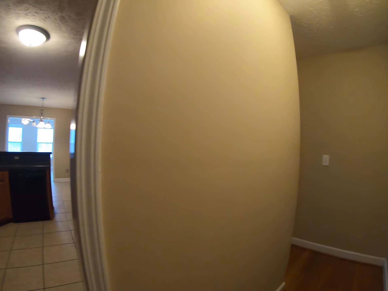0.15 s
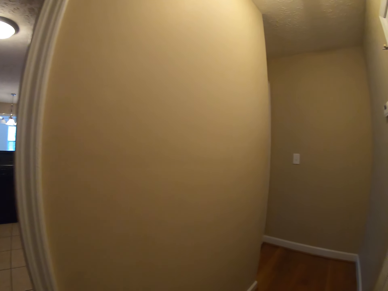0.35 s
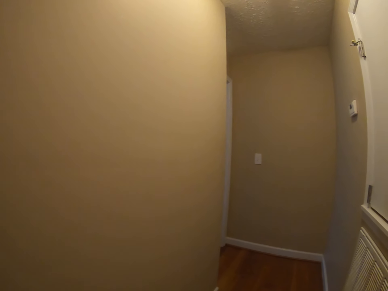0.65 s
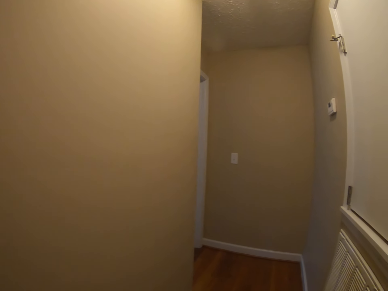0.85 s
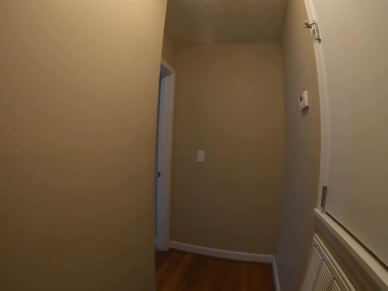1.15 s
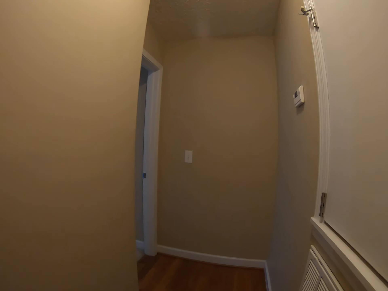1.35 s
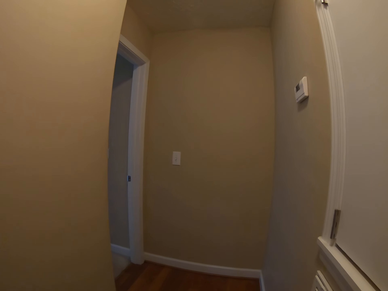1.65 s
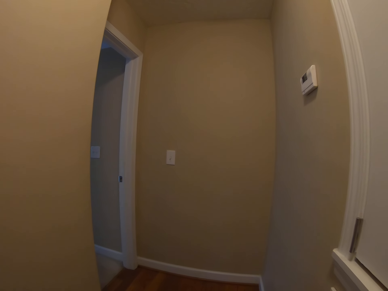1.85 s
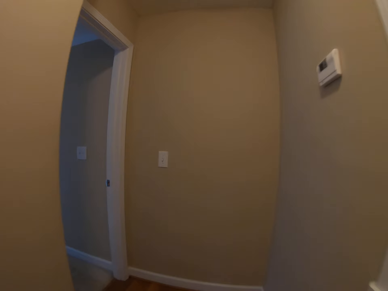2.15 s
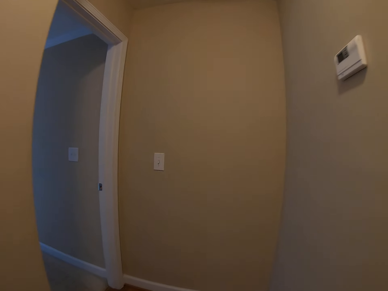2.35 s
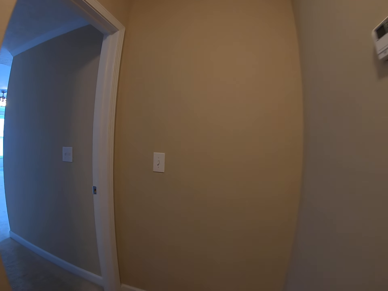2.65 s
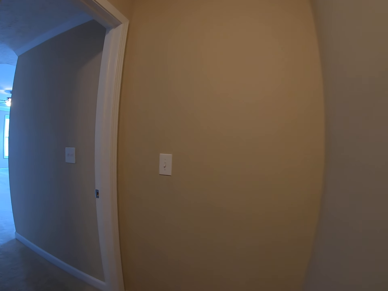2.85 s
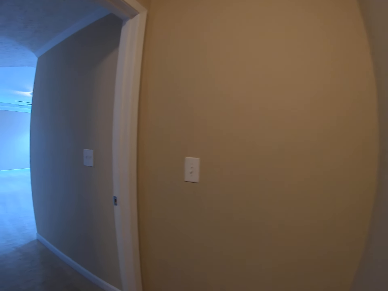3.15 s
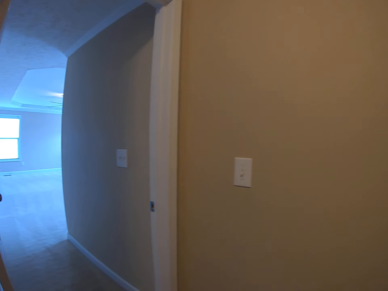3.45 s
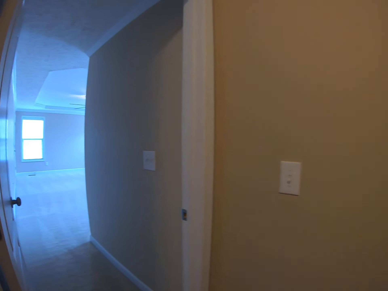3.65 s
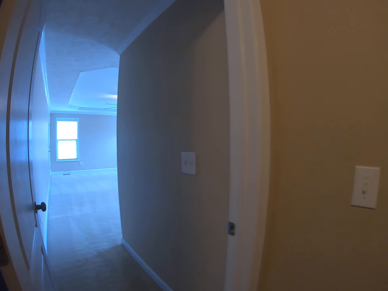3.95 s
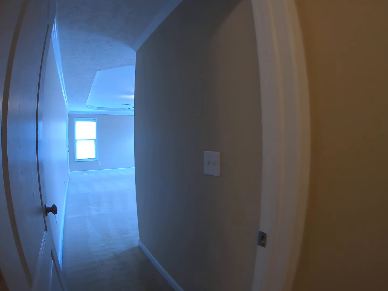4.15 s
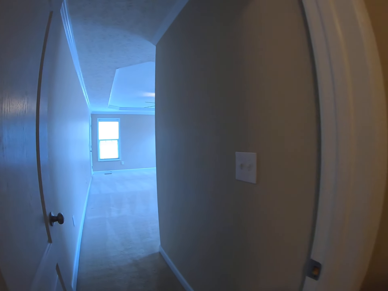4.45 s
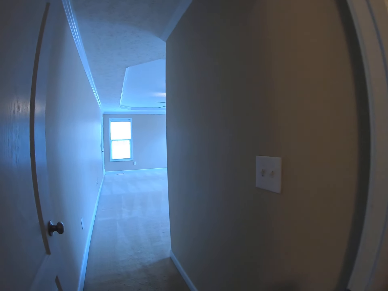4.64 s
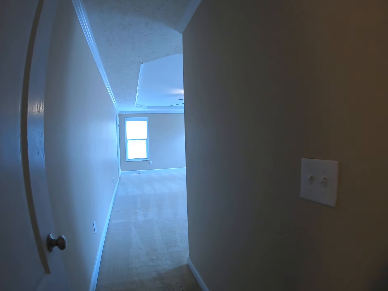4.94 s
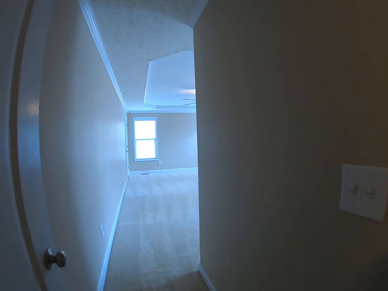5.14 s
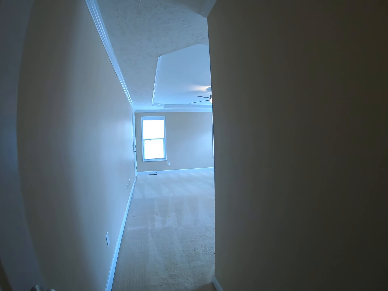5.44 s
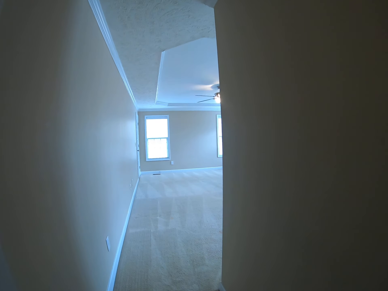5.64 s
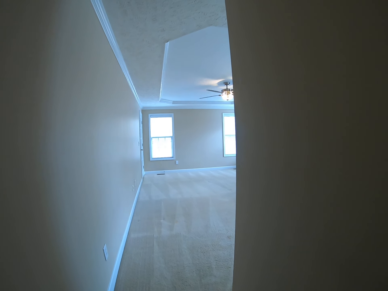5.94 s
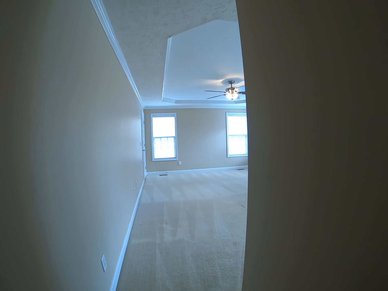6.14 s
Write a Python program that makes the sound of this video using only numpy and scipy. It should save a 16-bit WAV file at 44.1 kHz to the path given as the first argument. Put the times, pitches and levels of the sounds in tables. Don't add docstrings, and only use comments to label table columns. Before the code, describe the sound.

A small handheld camera is carried down a bare hallway in an empty house. A low hum and faint hiss open the scene, with a thin wavering motor whine near 1 kHz that swells around 1 second, dips near 2, and is clearer again from 3 to 5. Soft footsteps land at about 0.4, 1.2, 2.0, 2.7, 3.5, 4.3, 5.1 and 6.0 seconds. Each has a dull low heel thud, a toe thud shortly after, then a dry sole scuff about a quarter second after the heel, with gritty snaps, little knocks and brief squeaks. Heels are firmest at 1.2 and 2.0; scuffs are crisp near 1.5, 3.75 and 4.6. Boards ring briefly and bare walls give a short echo. The hum thins near 4.4, then returns. The final step is very soft, followed by a tiny plastic click at 6.1.

```python
import sys
import numpy as np
from scipy import signal
from scipy.fft import rfft, irfft, next_fast_len
from scipy.io import wavfile
from scipy.ndimage import uniform_filter1d

SR = 44100
rng = np.random.default_rng(int(sys.argv[2]) if len(sys.argv) > 2 else 0)


def nominal_scale(level):
    x = np.asarray(level, float) / 20
    return 10 ** x


def wrap_up_sound(samples):
    columns = np.atleast_2d(samples).T
    tamed = np.clip(columns, -1, 1)
    steps = np.round(tamed * 32767).astype(np.int16)
    wavfile.write(sys.argv[1], SR, steps)


N = 277429
MIC_KNEE_HZ = 8700


def evened(x):
    return x / np.sqrt(np.mean(x ** 2) + 1e-20)


def read(points, hz):
    f, value = np.transpose(points)
    return np.interp(np.log(hz + 1), np.log(f + 1), value)


def add(mix, s, sound):
    part = mix[round(s * SR):][:len(sound)]
    part += sound[:len(part)]


def resonate(x, hz, width):
    turn = np.exp(2j * np.pi * np.cumsum(hz * np.ones(len(x))) / SR)
    r = np.exp(-np.pi * width / SR)
    return 2 * (turn * signal.lfilter([1 - r], [1, -r], x / turn + 1e-18)).real


def resonate_twice(x, hz, width):
    return resonate(resonate(x, hz, width), hz, width)


def colour(x, gain_db):
    size = next_fast_len(x.shape[-1])
    gain = nominal_scale(gain_db(np.fft.rfftfreq(size, 1 / SR)))
    return irfft(rfft(x, size) * gain, size)[..., :x.shape[-1]]


def hump(hz, centre_hz, octaves):
    return np.exp(-.5 * (np.log2((hz + 1) / centre_hz) / octaves) ** 2)


def swell(t, rise):
    return (t / (2 * rise) * np.exp(1 - t / (2 * rise))) ** 2


def turned(x):
    return signal.hilbert(x, next_fast_len(len(x))).imag[:len(x)]


def bursts(rows, octaves, rise):
    t, out = np.arange(16384) / SR, np.zeros(N)
    noises = rng.standard_normal((len(rows), len(t)))
    for (s, db, centre_hz, contact), noise in zip(rows, noises):
        rough = colour(noise, lambda hz: -40 + 40 * hump(hz, centre_hz, octaves))
        stroke = (1 - np.exp(-t / rise)) ** 2 * np.exp(-t / (5.0 * max(contact, .001)))
        burst = stroke * rough
        add(out, s, nominal_scale(db + 0.5) * burst / abs(burst).max())
    return out


def snaps(rows, trim_db):
    t, out = np.arange(1024) / SR, np.zeros(N)
    for s, db, hz, ring in rows:
        snap = np.exp(-t / ring) * np.sin(2 * np.pi * hz * t)
        add(out, s, nominal_scale(db + trim_db) * snap / abs(snap).max())
    return out


# start in seconds, peak in dB, board pitch in Hz, joist thump in dB against the peak.
HEELS = [(0.41, -36, 180, -1), (0.44, -35.5, 162, -21), (0.479, -50.5, 151, 3), (1.237, -24.5, 149.3, -23),
         (1.254, -24, 150.5, -10.5), (1.28, -34, 100, -6), (2.01, -20, 117, -26), (2.03, -27, 157, -9.5),
         (2.081, -44, 151, 2.5), (2.724, -31.5, 161.5, -5), (3.493, -44, 148, -0.5),
         (3.518, -45.5, 151, -9), (4.315, -26, 139.6, -8.5), (4.347, -38, 133, -3), (5.111, -23, 196, -16),
         (5.134, -32.5, 153, -32), (5.162, -36, 162, -7), (5.957, -49.5, 151, -8), (5.993, -46.5, 154, -18),
         (6.04, -51.5, 160, -12)]
# the same four columns, in s, dB, Hz and dB.
TOES = [(0.569, -38, 176, -8), (1.306, -40, 200, -11), (1.327, -34, 166, -9), (1.348, -29.5, 154, -11.5),
        (1.408, -56, 152, 8), (1.437, -44, 172, -19.5), (2.115, -35, 130, -29), (2.139, -37.5, 151.6, -14),
        (2.798, -37.5, 111, -1.5), (2.829, -40.5, 151, -7), (2.865, -37.5, 161, -8),
        (2.898, -39, 188.6, -17), (3.593, -31, 151, -12), (3.637, -40, 162.4, -11), (4.39, -40, 151, -19),
        (4.462, -34, 152, -4.5), (4.53, -46.5, 157, -25), (5.198, -35.5, 169, -25), (5.22, -33, 184, -15),
        (5.28, -39.5, 160, -27)]
# the same four columns, in s, dB, Hz and dB.
LIFTS = [(0.668, -56, 159, 6.5), (0.796, -43.5, 178, -6.5), (1.497, -44, 189, -20),
         (1.565, -44.5, 177.4, -12), (1.815, -48.5, 185, -6), (2.209, -44, 200, -6),
         (2.987, -41.5, 143, -23), (3.081, -53.5, 232, -7), (3.75, -49, 230, -23), (3.8, -61, 181, 9),
         (3.836, -46, 102, -3.5), (4.578, -56, 219, -28), (4.713, -46, 150, -29), (5.321, -47, 212, -18),
         (5.35, -39.5, 173, -8.5), (5.433, -43, 196, -14), (5.96, -44, 48, -18), (6.035, -44, 45, -20)]
# pitch in Hz, width in Hz, level in dB.
FLOOR_MODES = [(63, 15, 4), (151, 12.2, 2), (229.2, 13.7, 6), (280, 9.1, 3.5), (366, 4.3, -6),
               (436, 14, 20), (634, 20, -2)]
# sole slap in dB against the peak, contact time in seconds.
HEEL, TOE, LIFT = (-17, 0.005), (-8.5, 0.0051), (-15, 0.0054)
JOIST_HZ, SLAP_HZ = 77.8, 257


def thuds():
    t, out = np.arange(5000) / SR, np.zeros(N)
    for rows, (slap_db, contact) in ((HEELS, HEEL), (TOES, TOE), (LIFTS, LIFT)):
        for s, db, hz, thump_db in rows:
            board = swell(t, contact) * np.sin(2 * np.pi * hz * t)
            joist = swell(t, 1.42 * contact) * np.sin(2 * np.pi * JOIST_HZ * t)
            slap = swell(t, 0.61 * contact) * np.sin(2 * np.pi * SLAP_HZ * t)
            add(out, s, nominal_scale(db) * (board + nominal_scale(thump_db) * joist + nominal_scale(slap_db) * slap))
    ringing = sum(nominal_scale(db) * resonate(out, hz, width) for hz, width, db in FLOOR_MODES)
    return out + ringing


# start in seconds, peak in dB, fade in seconds, fizz in dB against the peak.
TREADS = [(0.5493, -42.5, 0.032, -17.5), (1.2444, -50.5, 0.024, -2), (1.3063, -37.5, 0.029, -1.5),
          (1.3505, -53, 0.011, -6), (1.7514, -48.5, 0.019, -16), (2.02, -38.5, 0.016, 7),
          (2.1, -51, 0.033, 2), (2.1173, -49, 0.031, -18), (2.7307, -57, 0.013, -10),
          (2.8025, -42.5, 0.021, -6), (2.862, -50, 0.0096, -21), (3.5589, -47.5, 0.014, 17),
          (3.597, -39, 0.019, -12), (3.66, -49, 0.034, -1), (4.278, -54, 0.074, -13),
          (4.3892, -43, 0.017, -7), (4.3994, -43, 0.013, -13), (4.4653, -61, 0.02, -4),
          (4.9198, -54, 0.025, -25), (5.1184, -44.5, 0.019, -3), (5.1237, -38, 0.0046, -32),
          (5.178, -49.5, 0.012, 26), (5.2185, -45.5, 0.028, -4), (5.9408, -58, 0.036, -5),
          (5.9997, -59, 0.051, -18)]
# the same four columns, in s, dB, s and dB.
DRAGS = [(0.662, -42.5, 0.063, -7.5), (0.722, -50.5, 0.037, -18), (1.4631, -39, 0.0085, -12),
         (1.4774, -34, 0.029, -7), (2.195, -43, 0.046, -11), (2.214, -38.5, 0.032, -1),
         (2.2341, -38.5, 0.012, -29), (2.247, -46, 0.015, -13), (2.9548, -45.5, 0.057, -7),
         (2.978, -38.5, 0.043, -7.5), (3.0093, -39.5, 0.018, 1), (3.7238, -42, 0.024, -8),
         (3.7358, -36.5, 0.016, -8), (3.7461, -32, 0.015, -8), (3.757, -34.5, 0.023, -6.5),
         (4.5671, -38, 0.012, 0), (4.5732, -35.5, 0.0097, 1), (4.5954, -36.5, 0.016, -3.5),
         (5.2728, -45, 0.013, -5), (5.293, -42.5, 0.015, -1), (5.319, -42.5, 0.03, -15),
         (5.3429, -40.5, 0.024, -3), (5.364, -38, 0.008, 2), (5.3711, -39, 0.0062, -5),
         (5.385, -46.5, 0.02, -10)]
# pitch in Hz, level in dB per Hz.
SOLE = [(290, -11), (500, -7), (614, -14), (893, -1.5), (1270, 0.5), (2010, -2), (3910, -10), (4740, -11),
        (9000, -14.5), (11700, -42), (19800, -120)]
# squeak in dB against the peak when fizz is 0 dB, shortest rise in seconds.
TREAD, DRAG = (-4.5, .003), (-10.5, .005)
SQUEAK_PER_FIZZ, RISE_PER_FADE = 0.47, .22


def scuffs():
    t, out = np.arange(8192) / SR, np.zeros(N)
    rubs = [(*row, *TREAD) for row in TREADS] + [(*row, *DRAG) for row in DRAGS]
    for s, db, fade, fizz_db, squeak_db, rise in sorted(rubs):
        size = rng.exponential(1, len(t) // 64)
        slips = rng.standard_normal(len(t)) * np.repeat(nominal_scale(2.3 * np.minimum(size, 3.5)), 64)
        squeak_db = squeak_db + SQUEAK_PER_FIZZ * fizz_db
        rise = rise + RISE_PER_FADE * fade

        def sole_db(hz):
            squeak = (squeak_db + 7.0) * hump(hz, 1500, 0.49)
            fizz = (fizz_db + 12.0) * hump(hz, 9730, 0.69)
            return read(SOLE, np.minimum(hz, MIC_KNEE_HZ)) + squeak + fizz

        stroke = np.minimum(t / rise, 1) ** 2 * np.exp(-np.maximum(t - rise, 0) / fade)
        add(out, s - .5 * rise, nominal_scale(db - 6) * evened(colour(slips, sole_db)) * stroke)
    return out


# start in seconds, peak in dB, pitch in Hz, contact in seconds.
KNOCKS = [(0.553, -44.5, 611, 0.0055), (0.574, -46, 681, 0.0067), (0.805, -50.5, 970, 0.0021),
          (1.241, -44.5, 890, 0.0057), (1.307, -40.5, 468, 0.0015), (1.346, -36.5, 740, 0.0016),
          (1.368, -44, 557, 0.0019), (2.006, -39.5, 423, 0.0017), (2.025, -40, 734, 0.0059),
          (2.116, -37, 670, 0.006), (2.236, -44, 660, 0.0035), (2.728, -44, 460, 0.0056),
          (2.806, -41.5, 610, 0.0047), (2.86, -38.5, 730, 0.0025), (2.996, -44, 644, 0.0039),
          (3.401, -56, 980, 0.0017), (3.596, -41, 915, 0.0022), (3.612, -39, 444, 0.0017),
          (3.649, -50, 447, 0.0019), (3.749, -56, 860, 0.0017), (4.313, -42, 417, 0.0044),
          (4.382, -48, 980, 0.0068), (4.463, -44.5, 436, 0.003), (5.111, -47, 945, 0.0051),
          (5.224, -37, 670, 0.00081), (5.29, -44.5, 433, 0.0032), (5.317, -42, 940, 0.0033),
          (5.598, -68, 980, 0.0027), (5.989, -50.5, 1090, 0.003)]
# start in seconds, peak in dB, pitch in Hz, ring in seconds.
RAPS = [(0.569, -40, 528, 0.0015), (0.588, -39, 560, 0.0015), (0.803, -50, 993, 0.0015),
        (1.241, -37, 900, 0.0015), (1.306, -40, 468, 0.0015), (1.347, -38, 452, 0.0015),
        (1.356, -41, 778, 0.0015), (2.014, -37, 536, 0.0015), (2.025, -40, 756, 0.0015),
        (2.116, -39, 738, 0.0015), (2.73, -44, 476, 0.0015), (2.806, -39.5, 627, 0.0015),
        (2.866, -39, 735, 0.0015), (3.401, -51, 999, 0.0015), (3.592, -37, 996, 0.0015),
        (3.614, -40, 460, 0.0015), (4.398, -40, 993, 0.0015), (4.463, -40, 452, 0.0016),
        (5.111, -40, 996, 0.0015), (5.224, -40, 452, 0.0013), (5.224, -35, 670, 0.0015),
        (5.317, -38, 939, 0.0017)]


def knocking():
    return bursts(KNOCKS, octaves=1.09, rise=0.00082) + snaps(RAPS, trim_db=-2.5)


# start in seconds, peak in dB, pitch in Hz, contact in seconds.
SQUEAKS = [(1.35, -45, 1400, 0.0023), (1.478, -40.5, 1540, 0.0032), (2.225, -47.5, 2000, 0.0046),
           (2.24, -59, 2980, 0.005), (2.98, -46, 2150, 0.0032), (3.745, -41, 5000, 0.0046),
           (3.79, -58, 4700, 0.043), (.672, -47.5, 5300, 0.0046), (4.392, -42, 1460, 0.0015),
           (4.392, -46.5, 4730, 0.0024), (4.6, -50, 1820, 0.0038), (5.224, -46, 1350, 0.0016),
           (2.865, -56, 2400, 0.0026), (2.03, -51, 2000, 0.0035), (5.18, -59, 1900, 0.0029),
           (5.275, -62, 3900, 0.003), (5.35, -48, 2170, 0.002), (5.33, -49.5, 2880, 0.0065),
           (2.25, -47, 3600, .003), (5.13, -50.5, 2850, 0.0036)]
# start in seconds, peak in dB, pitch in Hz, contact in seconds.
PIPS = [
    (1.258, -58, 10300, .006),
    (1.258, -52, 14000, .005),
    (3.559, -57, 8800, 0.0035),
    (5.18, -60, 8530, .003),
]


def squeaking():
    return bursts(SQUEAKS, octaves=0.24, rise=0.002) + bursts(PIPS, octaves=.04, rise=.002)


# start in seconds, peak in dB, pitch in Hz, ring in seconds.
GRIT = [(0.548, -40, 2090, 0.0006), (0.5581, -45, 2090, 0.0006), (0.5714, -40, 2290, 0.0006),
        (0.5884, -43, 1560, 0.0006), (0.6624, -41, 2900, 0.0006), (0.6724, -41, 5280, 0.0006),
        (1.2414, -53, 1400, 0.0006), (1.2461, -48, 1770, 0.0006), (1.3067, -38, 1550, 0.0006),
        (1.3144, -43, 1410, 0.0006), (1.4633, -40, 1690, 0.0006), (1.477, -33, 1600, 0.00066),
        (1.4854, -33, 1560, 0.0006), (2.0213, -44, 1470, 0.0006), (2.0274, -36, 1900, 0.0006),
        (2.2096, -39, 1470, 0.0006), (2.225, -35, 2480, 0.0006), (2.2394, -37, 2030, 0.0006),
        (2.2524, -41, 3880, 0.0006), (2.7312, -50, 1690, 0.0006), (2.8035, -45, 1400, 0.0006),
        (2.8074, -45, 1500, 0.0006), (2.8599, -47, 1760, 0.0006), (2.867, -43, 1750, 0.0006),
        (2.9595, -44, 1670, 0.0006), (2.9786, -40, 2120, 0.0006), (2.9824, -36, 2240, 0.0006),
        (2.9994, -34, 2200, 0.0006), (3.016, -39, 2280, 0.0006), (3.5593, -48, 1600, 0.0006),
        (3.592, -45, 1500, 0.0006), (3.6022, -34, 1510, 0.00066), (3.7284, -42, 2010, 0.0006),
        (3.7469, -33, 4100, 0.0006), (3.7556, -31, 4640, 0.0006), (4.3949, -39, 1400, 0.0006),
        (4.395, -36, 1500, 0.0006), (4.5677, -43, 9200, 0.0006), (4.5745, -30.5, 5170, 0.00081),
        (4.5994, -34, 1950, 0.0006), (5.1198, -48, 1720, 0.0006), (5.1243, -41, 3460, 0.0006),
        (5.2254, -41, 1460, 0.0006), (5.2734, -46, 4020, 0.0006), (5.293, -38, 2220, 0.0006),
        (5.317, -39, 2220, 0.0006), (5.3354, -40, 2990, 0.0006), (5.3494, -37, 2100, 0.0006),
        (5.3654, -37, 2160, 0.0006), (5.3727, -35, 2100, 0.00051)]


def gritting():
    return snaps(GRIT, trim_db=-4)


# start in seconds, peak in dB, pitch in Hz, contact in seconds.
RINGS = [(.58, -49.5, 285, .03), (.95, -52, 286, 0.038), (1.26, -43, 282, .012), (2.6, -54, 292, 0.028),
         (2.85, -49, 284, .03), (4.47, -47, 230, 0.0056), (4.56, -47.5, 290, 0.022),
         (2.04, -45, 368, 0.012), (3.72, -46.5, 307, 0.017), (1.35, -39.5, 350, 0.0039),
         (3.608, -40, 171, 0.0034)]


def loose_boards():
    return bursts(RINGS, octaves=0.13, rise=0.0056)


# start in seconds, peak in dB.
TICKS = [
    (6.123, -46),
    (3.3, -60),
    (1.2455, -48),
    (5.785, -55),
]


def ticks():
    t, out = np.arange(300) / SR, np.zeros(N)
    for s, db in TICKS:
        plastic = resonate_twice(rng.standard_normal(len(t)), 11500, 5000)
        add(out, s, nominal_scale(db) * np.exp(-t / 0.003) * plastic)
    return out


def scatter(x):
    taps = rng.standard_normal(900) * np.exp(-np.arange(900) / 200)
    return signal.oaconvolve(x, taps / np.linalg.norm(taps))[:N]


# pitch in Hz, time to fall by 60 dB in seconds.
HALL = [(200, 0.58), (700, 0.41), (2000, 0.67), (5000, 0.75), (10000, 0.5)]


def hall(x):
    taps = np.zeros((2, SR))
    at = np.arange(200, SR - 20, 20) + rng.integers(0, 20, (2, (SR - 201) // 20))
    np.put_along_axis(taps, at, rng.choice([-1., 1.], at.shape), 1)
    hz, t, z = signal.stft(taps, SR, nperseg=512)
    decay = nominal_scale(-60 * t / read(HALL, hz)[:, None])
    tail = signal.istft(z * decay, SR, nperseg=512)[1]
    tail = tail * np.linspace(1, 0, tail.shape[1])
    return signal.fftconvolve(x[None], tail / np.linalg.norm(tail[0]), axes=1)[:, :N]


# time in seconds, level in dB.
MOTOR = [(0, -77), (.55, -66.5), (1, -56), (1.4, -66), (2, -73), (2.7, -65), (3.1, -59), (3.8, -56),
         (4.3, -57), (5.2, -59.5), (5.7, -62), (6.29, -66.5)]
# pitch in Hz, width in Hz, level in dB.
MOTOR_BANDS = [(1013, 2.9, -63), (1056, 58, -62.5), (1151, 96, -52.5), (1227, 21, -75), (1996, 6, -70.5),
               (1563, 48, -70.5)]
WHISTLE_HZ, WHISTLE_LEAK_DB = 985.5, -4.5
LEAK_DB = -12


def motors():
    t = np.arange(N) / SR
    waver = evened(uniform_filter1d(rng.standard_normal(N), 1800))
    pitch_hz = WHISTLE_HZ + 4 * np.roll(waver, N // 2)
    level = nominal_scale(np.interp(t, *np.transpose(MOTOR)) + 2.2 * waver)
    whistle = level * np.sqrt(2) * np.cos(2 * np.pi * np.cumsum(pitch_hz) / SR)
    whine = np.zeros(N)
    for hz, width, db in MOTOR_BANDS:
        whine += nominal_scale(db) * evened(resonate_twice(rng.standard_normal(N), hz, width))
    stray = nominal_scale(-65.0) * evened(resonate_twice(rng.standard_normal(N), 1070, 200))
    whine_left = nominal_scale(LEAK_DB) * (0.69 * whine + 0.97 * turned(whine))
    whistle_left = 0.13 * whistle + 0.7 * turned(whistle)
    return np.array([whine_left + whistle_left + stray, whine + whistle / nominal_scale(WHISTLE_LEAK_DB)])


# pitch in Hz, level in dB per Hz.
HOUSE = [(13, -42), (22, 4), (68, -10), (107, -56), (145, -6), (173, -3), (234, -12.5), (253, -15.5),
         (294, -14.5), (691, -21.5), (1010, -18.5), (1330, -24.5), (2040, -27.5), (2490, -31), (4500, -35),
         (7500, -33.5), (9000, -34.5), (11700, -71), (19800, -120)]
# pitch in Hz, level in dB per Hz.
PORTS = [(13, -61), (22, -25), (102, -22), (272, -15.5), (537, -27), (625, -18.5), (674, -18.5),
         (959, -14.5), (1170, 0.5), (1470, -35), (2040, -31), (2620, -35), (4500, -37.5), (9000, -32),
         (11700, -69), (19800, -120)]
# time in seconds, level in dB.
HUM = [
    (0, -54),
    (.66, -52.5),
    (1.77, -54.5),
    (2.52, -62),
    (3.31, -62),
    (3.75, -65),
    (4.08, -59.5),
    (4.41, -81.5),
    (5.08, -60.5),
    (6.29, -56),
]
# time in seconds, strength from 0 to 1.5.
STEPS = [
    (.41, 0.5),
    (1.24, 0.9),
    (2.01, 0.98),
    (2.72, 0.94),
    (3.55, 1.1),
    (4.31, 0.74),
    (5.11, 0.7),
    (5.96, 0.47),
]
# time in seconds, level in dB.
HAND = [(0, -3), (.7, -5), (1.4, -1), (2.2, -5), (2.8, 0.5), (3.2, -2), (3.6, 3.5), (4.05, -5.5), (4.4, 5),
        (4.62, -4), (5, -1.5), (5.6, 1), (6.29, 2)]
# time in seconds, level in dB.
AIR = [(0, -2.5), (.5, -1), (1, 1.5), (1.9, 1.5), (2.6, 0), (3.4, -0.5), (4.1, 0.5), (4.9, 0), (5.5, -3.5),
       (5.9, -1.5), (6.29, -1)]
HOUSE_DB, PORTS_DB = -51.5, -52.5
STIR_LAG_S, STIR_WIDTH_S = 0.2, 0.19
STIR_DB = (7.5, 8.5, 4)
TREND_DB_PER_S = (0.5, -1.7, -0.33)


def background():
    frames, hz = N // 512 + 5, np.fft.rfftfreq(2048, 1 / SR)[:, None]
    a, b, c, d, patches = rng.standard_normal((frames, 1025, 5)).T
    patches = evened(uniform_filter1d(uniform_filter1d(patches, 20, 0), 8, 1))
    t = np.arange(frames) * 512 / SR
    stir = sum(weight * np.exp(-.5 * ((t - step - STIR_LAG_S) / STIR_WIDTH_S) ** 2) for step, weight in STEPS)
    stir, walk = stir - stir.mean(), t - t.mean()
    rumble, murmur, hiss = (db * stir + trend * walk for db, trend in zip(STIR_DB, TREND_DB_PER_S))
    rumble = rumble + np.interp(t, *np.transpose(HAND))
    hiss = hiss + np.interp(t, *np.transpose(AIR))
    s, hum_db = np.transpose(HUM)
    hum = np.interp(t, s, hum_db - hum_db.mean())
    drift = rumble * (hz < 95) + hum * hump(hz, 180.7, 0.11) * (hz >= 95)
    drift = drift + murmur * hump(hz, 357, 0.75) + hiss / (1 + (1500 / (hz + 1)) ** 2)
    ring = sum(3.1 / (1 + ((hz - f) / width) ** 2) for f, width, _ in FLOOR_MODES)
    dips = 4.3 * hump(hz, 6040, 0.082) + 3.7 * hump(hz, 15900, 0.12)
    colours = np.array([read(table, np.minimum(hz, MIC_KNEE_HZ)) for table in (HOUSE, PORTS)])
    shape_db = colours + drift + ring - dips + 1.1 * patches
    spectra = np.array([a + 1j * b, c + 1j * d]) * nominal_scale(shape_db)
    both = signal.istft(spectra, nperseg=2048, noverlap=1536)[1][:, :N]
    return np.array([nominal_scale(HOUSE_DB) * evened(both[0]), nominal_scale(PORTS_DB) * evened(both[1])])


# pitch in Hz, level in dB.
WIDTH = [(60, -20.5), (200, -24), (400, -16), (1000, -2.5), (3000, -6), (9000, -0.5)]


def scene():
    low, knocks = thuds(), knocking()
    bright = squeaking() + gritting()
    high = scuffs() + bright
    in_sum = low + knocks + high + ticks()
    in_difference = 0.37 * turned(low) + scatter(1.1 * knocks + 1.1 * bright) + 1.1 * scuffs()
    echoes = hall(nominal_scale(-10.0) * low + nominal_scale(-5.5) * knocks + nominal_scale(-5.5) * high)
    steps = np.array([in_sum, in_difference]) + echoes
    steps[1] = colour(steps[1], lambda hz: read(WIDTH, hz))
    mid, side = steps + background() + motors()
    mid = mid + loose_boards()
    return np.array([mid + side, mid - side])


# pitch in Hz, level in dB.
LEAN = [(60, -0.5), (250, -1.5), (700, -0.67), (2500, -0.27), (5000, 0), (9000, -4.5)]
# pitch in Hz, level in dB.
MIC = [(8800, 0), (9800, -6.5), (10800, -18.5), (12500, -24), (14800, -28), (15600, -41)]


def housing(dry):
    left = colour(dry[0], lambda hz: read(LEAN, hz))
    return colour(np.array([left, dry[1]]), lambda hz: read(MIC, hz))


def squelch(x, edge_hz, floor_db):
    hz, _, z = signal.stft(x, SR, nperseg=1024)
    power = uniform_filter1d(abs(z.mean(0)) ** 2, size=8, axis=0)
    power = uniform_filter1d(power, size=2, axis=1)
    kept = (power > nominal_scale(2 * floor_db)) | (hz < edge_hz)[:, None]
    return signal.istft(z * np.maximum(kept, .08), SR, nperseg=1024)[1][:, :N]


def roll_off(x):
    return signal.sosfilt(signal.butter(12, 15640, fs=SR, output="sos"), x)


def record(dry):
    mix = squelch(housing(dry), edge_hz=10700, floor_db=-118.5)
    return roll_off(mix)


dry = scene()
out = record(dry)
wrap_up_sound(out)
```